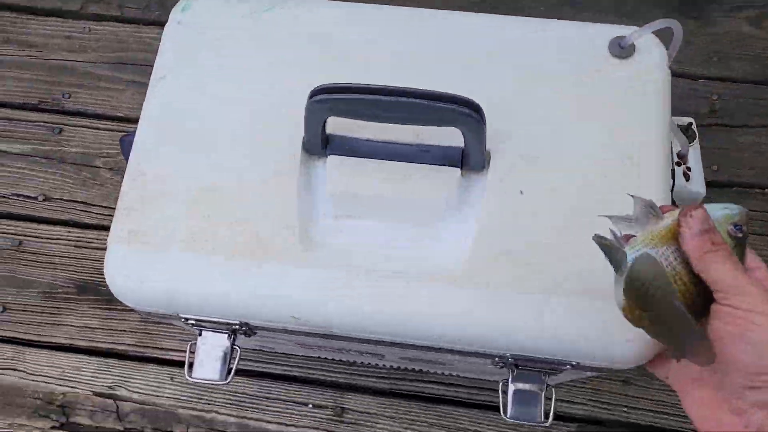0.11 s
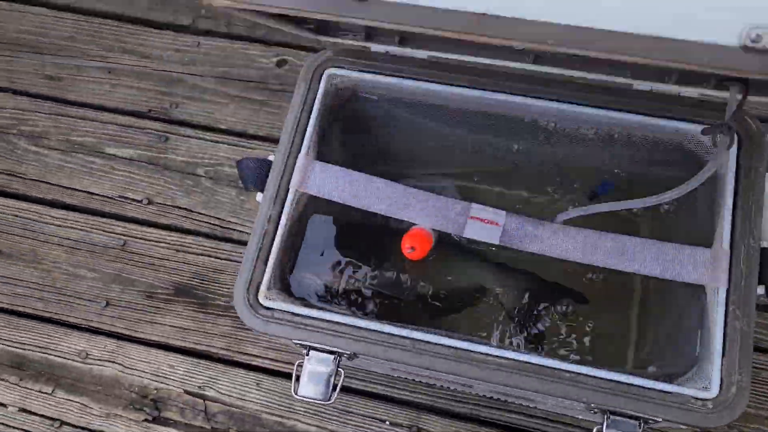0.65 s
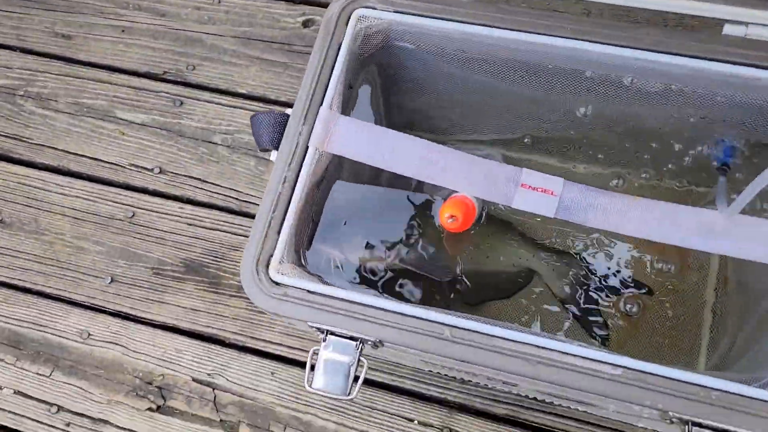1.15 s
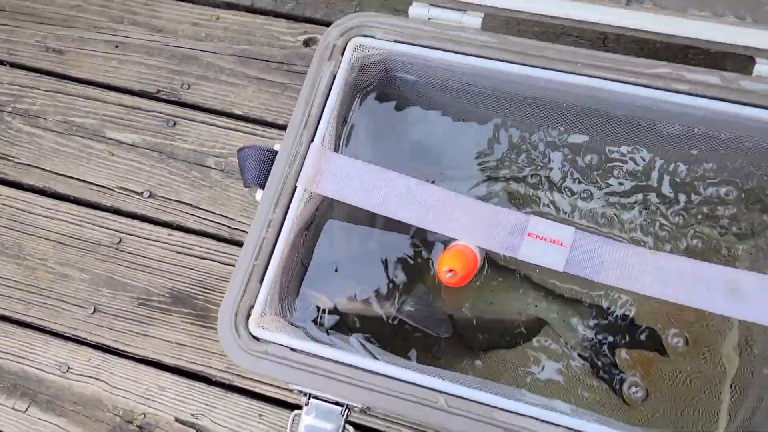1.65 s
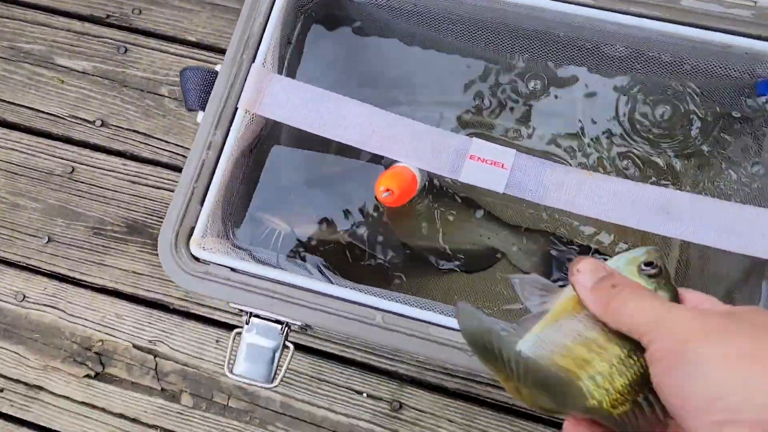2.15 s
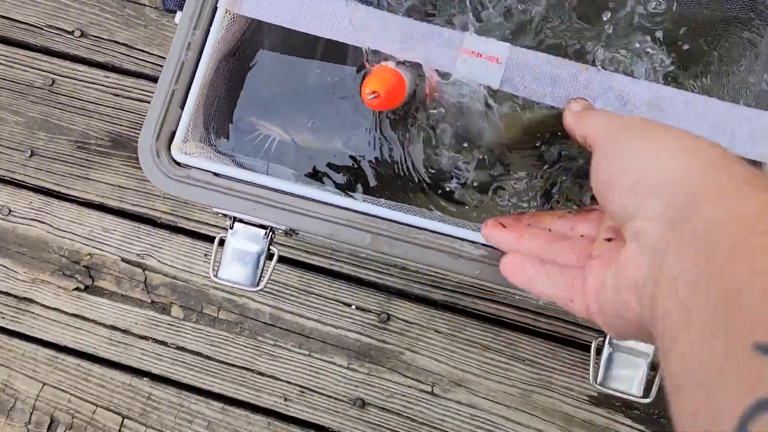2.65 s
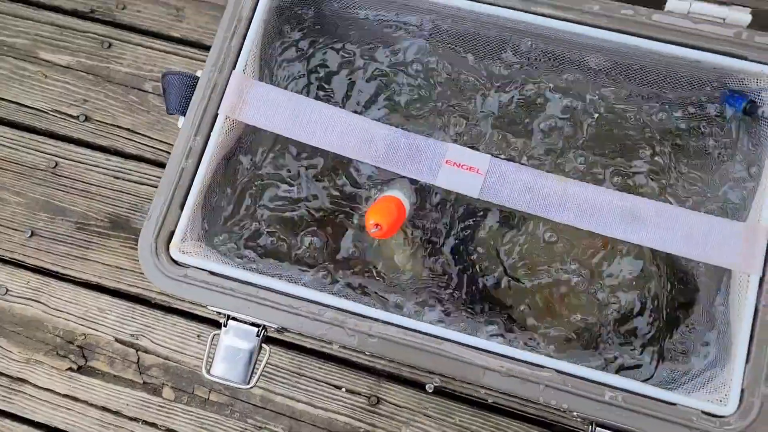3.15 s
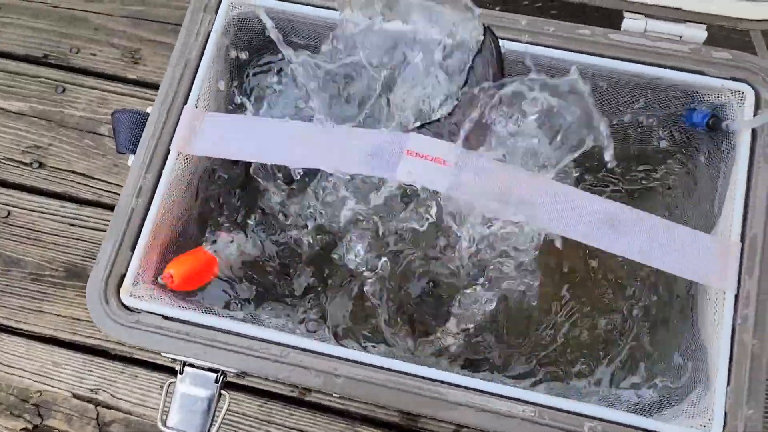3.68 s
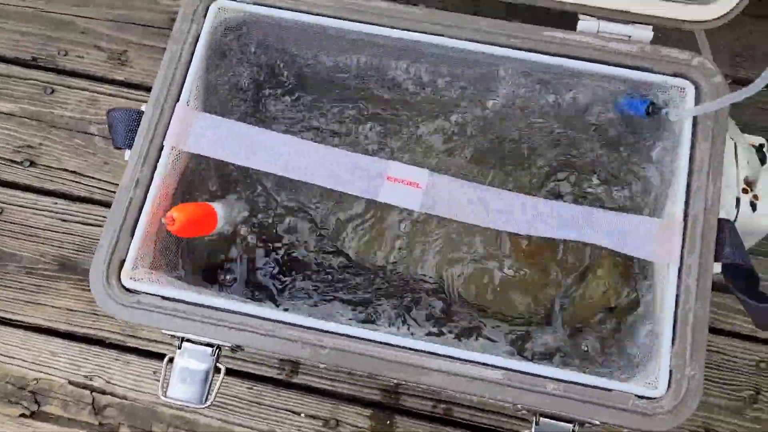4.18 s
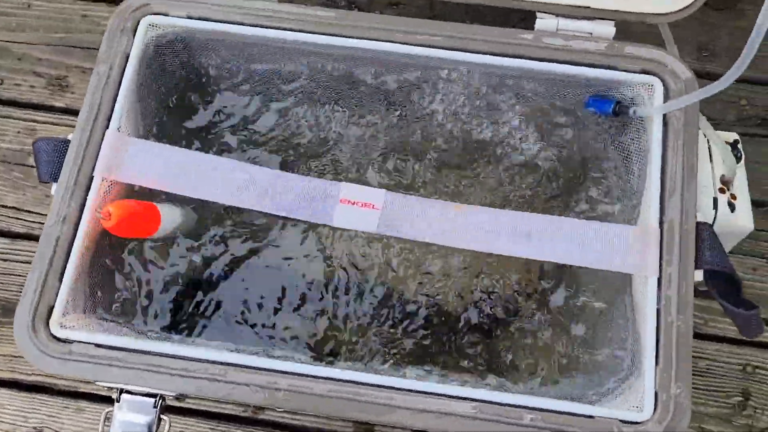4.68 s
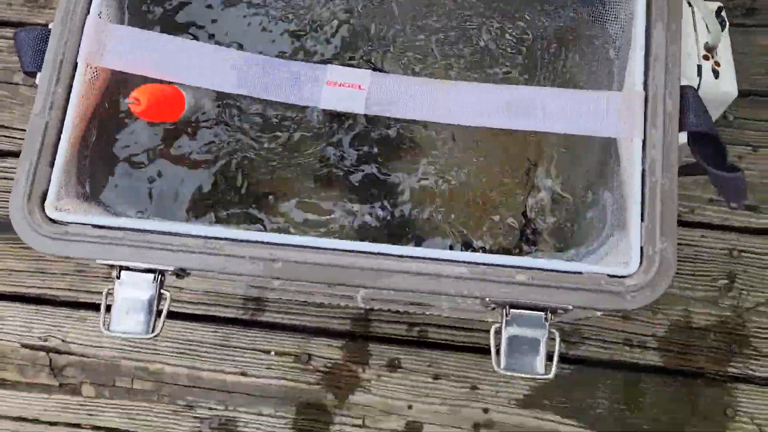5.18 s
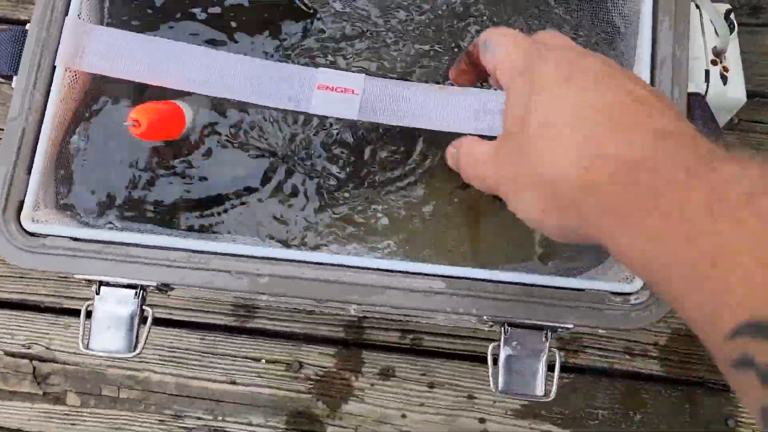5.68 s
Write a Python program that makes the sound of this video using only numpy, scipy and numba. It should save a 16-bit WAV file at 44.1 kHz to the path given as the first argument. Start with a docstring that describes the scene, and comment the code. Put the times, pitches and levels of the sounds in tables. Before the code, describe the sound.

On an open wooden dock by a lake, a small diaphragm pump runs throughout, close and to the right: a dry, rapid ticking of about eleven beats a second with gear rattle and a faint whine. Air fizzes finely in the water in matching pulses. Soft low bumps come through planks and hand from 0.3 s, and the pump dips slightly in level near 1 s as the lid is up. At 1.83 s a sharp crack knocks the plastic box. From 2.7 to 3.1 s a fish splashes in with crisp spray and plops. A lull follows, then the strongest thrashing, 3.7 to 4.15 s, with hollow gulps and bubbles, fading to small drips by 4.5 s. A distant boat engine drones low and drops in pitch around 3 s. Breeze rumbles gently on the phone. At 5.65 s a dull box thump and scuff, then faint wet rubbing squeaks.

```python
"""A wooden dock on a lake: close by on the right, a small diaphragm pump ticks round beside an open bait box.
Its valve knocks and gear rattle ring the housing; air fizzes up in the water as puffs of noise.
A fish flaps, is dropped in and thrashes ahead: noise bursts of spray, ringing air pockets, swarming bubbles.
Blows ring the box walls, dull bumps come through planks and hand, wet fingers squeak faintly.
A far boat engine drones and slows; a light breeze rumbles on the two ports of a hand-held phone."""
import sys
import numpy as np
from scipy import signal
from scipy.fft import rfft, irfft
from scipy.io import wavfile
from scipy.ndimage import uniform_filter1d, map_coordinates
from numba import njit

SR = 44100
rng = np.random.default_rng(int(sys.argv[2]) if len(sys.argv) > 2 else 0)


def to_wav(s):
    """Save 16-bit WAV."""
    ch = np.atleast_2d(s).T  # columns
    pcm = np.round(np.clip(ch, -1, 1) * 32767)  # PCM
    wavfile.write(sys.argv[1], SR, pcm.astype(np.int16))


def volts_from_db(level):
    """Convert decibel levels to linear amplitude ratios."""
    exponent = np.asarray(level, float) / 20
    return 10 ** exponent


N = 256662
T = np.arange(N) / SR


def shape(x, points):
    """Filters by points of f/Hz, gain/dB, joined along log frequency."""
    hz, db = np.transpose(points)
    f = np.maximum(np.arange(N // 2 + 1) * SR / N, 1)
    return irfft(rfft(x) * volts_from_db(np.interp(np.log(f), np.log(hz), db)), N)


def level(x, db):
    """Sets the rms over all channels together."""
    return x * volts_from_db(db) / np.sqrt(np.mean(x ** 2))


def curve(table):
    """Draws each column of a table along time, the first column being t/s."""
    s, *columns = np.transpose(table)
    return [np.interp(T, s, c) for c in columns]


def walk(rate):
    """Random wander: values held for 1 / rate s, then smoothed twice."""
    k = int(SR / rate)
    held = np.repeat(rng.standard_normal(N // k + 1), k)
    return 1.346 * uniform_filter1d(uniform_filter1d(held, k), k)[:N]


def swell(s, rise_s, fall_s):
    """Climbs exponentially to 1 at s, then dies away; both times are time constants."""
    return np.exp(np.minimum((T - s) / abs(rise_s), (s - T) / abs(fall_s)))


def noise(own):
    """Two channels of noise; a spread-out source gives each port a part of its own."""
    return rng.standard_normal(N) + own * rng.standard_normal((2, N))


def ring(x, hz, width):
    """One damped resonance whose impulse response peaks near 1."""
    return signal.lfilter([1], [1, -np.exp((2j * hz - width) * np.pi / SR)], x).imag


@njit
def add(out, s, size, hz, t60, rise, pan):
    """Adds tones that swell within about a cycle, then fade while their pitch climbs by the share rise."""
    for k in range(len(s)):
        i, z, n, swell = int(s[k] * SR), size[k] + 0j, t60[k] * SR, 0.
        p = np.exp(2j * np.pi * hz[k] / SR - np.log(1000) / n)
        turn = np.exp(2j * np.pi * hz[k] * rise[k] / SR / n)
        for j in range(i, min(i + int(n), out.shape[1])):
            swell += (1 - swell) * 2 * hz[k] / SR
            out[0, j] += z.imag * swell * pan[k]
            out[1, j] += z.imag * swell / pan[k]
            z, p = z * p, p * turn


def place(x, lag_ms):
    """A source right of centre reaches the left port later than the right."""
    x = x * np.ones((2, 1))
    late = map_coordinates(x[0], [np.arange(N) - lag_ms * SR / 1000], order=3)
    return np.array([late, x[1]])


CRANK_HZ = 10.66
LID_S, LID_DB = 1, -1  # the pump is quieter until the lid is up and the phone leans in
# modes of the pump housing, close on the right: f/Hz, width/Hz
HOUSING_MODES = [(490, 30), (720, 50), (1080, 75), (1545, 70), (1745, 85), (1960, 120), (3200, 500)]
# knocks of valves and rod in every crank turn: place in the turn (0-1), housing mode, drive level/dB
CRANK_KNOCKS = [(0.1, 0, -50), (0.8, 0, -56), (0.75, 1, -47), (0.94, 1, -46), (0.3, 1, -53),
                (0.94, 2, -41.5), (0.4, 2, -45.5), (.45, 4, -38.5), (0.99, 4, -38.5), (0.7, 4, -52),
                (.05, 3, -36.5)]
# gear rattle driving each housing mode, in their order: mean drive level/dB
RATTLE_DRIVE = [-82, -73, -73, -73, -68.5, -85.5, -68.5]
# gear-mesh tones: f/Hz, mean level/dB
GEAR_TONES = [(479.7, -67), (639.6, -69), (799.5, -71), (1066, -70)]


def pump():
    """Knocks and gear rattle ring the housing modes on every crank turn, over wavering gear tones."""
    starts = np.arange(int(N / SR * CRANK_HZ)) / CRANK_HZ
    taps = np.zeros((len(HOUSING_MODES), N + SR))
    for share, mode, db in CRANK_KNOCKS:
        chance = rng.standard_normal((len(starts), 2))
        when = starts + share / CRANK_HZ + .00005 * chance[:, 0]
        taps[mode, (when * SR).astype(int)] += volts_from_db(db + 1.5 * chance[:, 1])
    turn = T * CRANK_HZ % 1
    teeth = .4 + np.exp(-(turn * 15 % 1) / .3)  # 15 teeth a turn
    # worn teeth repeat their pattern; only a part is new on each turn
    pattern = 64 * irfft(np.exp(2j * np.pi * rng.random(2049)))
    rattle = teeth * (pattern[(turn * 4096).astype(int)] + .5 * noise(own=1.0))
    body = 0
    for tap, drive_db, (hz, width) in zip(taps, RATTLE_DRIVE, HOUSING_MODES):
        shake = volts_from_db(drive_db + 1.97 * walk(12)) * rattle
        # rubber valves land softly: a knock swells into its mode instead of clicking
        soft = ring(tap[:N] + shake, hz, 3 * width) * 6 * np.pi * width / SR
        body = body + ring(soft, hz, width)
    body = body * volts_from_db(LID_DB / (1 + np.exp((T - LID_S) / 0.1)))
    tones = sum(volts_from_db(db + 2 * walk(2.64)) * np.sqrt(2) * np.sin(2 * np.pi * hz * T) for hz, db in GEAR_TONES)
    return body + tones


# air from the stone in the water: t/s, level between puffs/dB, mean puff depth/dB
AIR_STONE = [(0, -55, -22), (1.9, -56, -7), (2.3, -58.5, 7), (3.6, -56, 4), (4.5, -51, -13),
             (4.9, -54.5, 4.5), (5.82, -53.5, -5.5)]
# its colour: f/Hz, relative level per Hz/dB
AIR_STONE_COLOUR = [(1500, 0), (2500, 2.5), (4500, 2), (7200, -4.5), (9000, -18), (14000, -7), (16500, -23)]


def fizz():
    """Tiny bubbles burst as grainy noise in puffs, two for each crank turn."""
    fizz_db, puff_db = curve(AIR_STONE)
    pulse = np.exp(1.03 * (np.cos(4 * np.pi * (T * CRANK_HZ - .02)) - 1))
    puff = 1 + volts_from_db(puff_db + 2 * walk(22)) * pulse
    grains = rng.standard_normal((2, N)) * volts_from_db(1.8 * walk(400))
    return level(shape(grains, AIR_STONE_COLOUR), 0.0) * puff * volts_from_db(fizz_db)


# hush of lake and shore all round: f/Hz, relative level per Hz/dB
SHORE_COLOUR = [(120, -15), (200, -1), (300, -5.5), (430, -2.5), (600, -8), (900, -8), (1400, -2.5),
                (2000, -4), (2600, -9.5), (5870, -18.5), (7320, -14.5), (11000, -30), (14500, -21),
                (15600, -19), (16500, -58)]


def open_air():
    """The wide hush of lake and shore is steady noise, mostly separate at each port."""
    return level(shape(noise(own=1.77), SHORE_COLOUR), -50)


THROTTLE_S, SLOWING_S = 3.0, 0.3  # throttled back from this moment, over this time
# far boat engine: cruising f/Hz, idling f/Hz, cruising level/dB, idling level/dB (before swells and waver)
ENGINE_DRONES = [(95, 56, -47, -54), (163.3, 110, -57, -56), (187.9, 173.5, -56.5, -58)]
# swells as the wind carries it over: t/s, level change/dB (each drone takes its own share)
WIND_CARRY = [(0, 5), (.4, -5.5), (.8, 0.5), (1.45, -4), (1.8, 4.5), (2.2, -6), (2.95, 6.5), (3.12, 3),
              (3.3, -6), (4, -1.5), (5.82, -1)]


def engine():
    """Three sine drones slide from cruise to idle and waver in pitch and level over the water."""
    idle = np.clip((T - THROTTLE_S) / SLOWING_S, 0, 1)
    carry_db = curve(WIND_CARRY)[0]
    out = 0
    for (hz0, hz1, db0, db1), share in zip(ENGINE_DRONES, (1.1, .4, -.3)):
        drone_db = db0 + (db1 - db0) * idle + share * carry_db + 1.93 * walk(13)
        hz = (hz0 + (hz1 - hz0) * idle) * (1 + 0.0218 * walk(18))
        out = out + np.sqrt(2) * volts_from_db(drone_db) * np.sin(2 * np.pi * np.cumsum(hz) / SR)
    return out


BREEZE_DB = -49.5  # steady part
SURGE_RISE, SURGE_FALL = 0.84, 0.29  # time constants as shares of the length of a gust or thump
# gusts at the microphone ports; the last row, short and strong, is the low thump of a hand bump:
# peak t/s, level/dB, length/s
GUSTS_AND_THUMP = [(0.356, -42, 0.34), (1.29, -47.5, 0.99), (1.994, -43.5, .5), (3.46, -47.5, .8),
                   (4.407, -47, 0.31), (4.69, -51, 0.19), (5.49, -42, 0.23), (5.68, -35, 0.059)]
# low rumble at the ports: f/Hz, relative level per Hz/dB
RUMBLE_COLOUR = [(12, -45), (20, 4.5), (91, 7.5), (140, 0.5), (184, -7.5), (236, -6.5), (353, -15),
                 (400, -17), (520, -60), (880, -120)]


def breeze():
    """Low rumble, partly shared by the ports; gusts and a hand's thump build slower than they drop."""
    rumble = rng.standard_normal(N) + 0.76 * rng.standard_normal((2, N))
    power = volts_from_db(BREEZE_DB) ** 2
    for s, db, length in GUSTS_AND_THUMP:
        power = power + (volts_from_db(db) * swell(s, SURGE_RISE * length, SURGE_FALL * length)) ** 2
    return level(shape(rumble, RUMBLE_COLOUR), 0) * np.sqrt(power)


BUMP_T60_S, BUMP_DAMPING = .125, 0.73  # at 60 Hz; higher bumps die sooner by this power
# dull bumps through planks and hand: t/s, starting level/dB, f/Hz
PLANK_BUMPS = [(0.328, -25, 59.5), (0.541, -25.5, 62), (0.593, -26, 127), (1.249, -26, 64.4),
               (2.955, -23, 149), (2.97, -23, 260), (3.03, -20.5, 322), (3.319, -24, 63), (3.558, -25, 264),
               (3.97, -24.5, 145), (4.066, -21, 380), (4.079, -31, 228), (4.111, -30.5, 110),
               (4.259, -24.5, 131), (4.74, -26, 70), (5.3, -30.5, 60), (5.335, -32.5, 223),
               (5.429, -24, 60)]


def bumps():
    """Each bump is a short low tone of steady pitch, alike at both ports."""
    out = np.zeros((2, N))
    s, db, hz = np.transpose(PLANK_BUMPS)
    add(out, s, volts_from_db(db), hz, BUMP_T60_S * (60 / hz) ** BUMP_DAMPING, 0 * s, 1 + 0 * s)
    return out


# blows on the bait box nearby: t/s, push level/dB, softness (contact time)/ms
BOX_BLOWS = [(1.83, -24, 0.63), (1.8332, -23, 0.78), (1.838, -32.5, 0.55), (1.856, -40, 0.41),
             (5.639, -34, 1.7), (5.645, -36, 2), (5.658, -21, 3.3), (5.676, -29.5, 3.8), (5.693, -47, 0.43),
             (5.706, -45, 1.1)]
# modes of its plastic walls: f/Hz, relative level/dB, t60/s
BOX_MODES = [(110, -26, .15), (179, -11, 0.14), (236, -11, 0.12), (337, -5, 0.047), (565.6, 4.5, 0.052),
             (682, 8, 0.046), (975, -12, 0.041), (1150, -20, .05), (2033, 7.5, 0.045)]


def box():
    """Soft pushes ring the plastic walls; longer contact favours the low modes."""
    push = np.zeros(N)
    for s, db, ms in BOX_BLOWS:
        bump = np.hanning(int(ms * SR / 1000) + 3)
        push[int(s * SR):][:len(bump)] += volts_from_db(db) * bump / bump.sum()
    return sum(-volts_from_db(db) * ring(push, hz, np.log(1000) / np.pi / t60) for hz, db, t60 in BOX_MODES)


# dry contact on the box, a crack and the scuff of a hand: t/s, level/dB, centre f/Hz, t60/s
CONTACT_NOISE = [(1.8336, -21.5, 6030, 0.014), (1.84, -29, 2100, .03), (5.64, -27.5, 420, 0.057),
                 (5.643, -35, 1800, 0.05), (5.661, -27.5, 348, 0.065), (5.685, -33, 760, 0.075)]


def scuffs():
    """Contact on the box makes bursts of noise about an octave wide, quick to start."""
    out = 0
    for s, db, hz, t60 in CONTACT_NOISE:
        band = ring(ring(noise(own=0.54), hz, 1.4 * hz), hz, 1.4 * hz)
        out = out + level(band, db) * swell(s + 0.0011, 0.00033, t60 / np.log(1000))
    return out


WATER_RISE_S = 0.037  # time constant
# spans in which bubbles form in the water ahead: from t/s, to t/s
STIRRED_SPANS = [(2.6, 3.3), (3.4, 4.7)]
# surges of stirred water: peak t/s, gurgle level/dB, hiss level/dB, fall time constant/s
WATER_SURGES = [(2.7, -49, -46, .012), (2.78, -48, -32.5, 0.071), (2.86, -61, -36.5, 0.045),
                (2.91, -41, -41.5, 0.051), (3.02, -50, -44, 0.1), (3.55, -48.5, -54, 0.091),
                (3.779, -32, -33, 0.062), (3.892, -34.5, -25.5, 0.046), (3.94, -37, -32.5, 0.025),
                (3.98, -29.5, -26, 0.027), (4.079, -32, -31, 0.066), (4.3, -57, -43.5, 0.13),
                (4.38, -46, -63, 0.046)]
# hiss of its droplets: f/Hz, relative level per Hz/dB
DROPLET_COLOUR = [(700, -6.5), (1300, 0.5), (2000, 0), (3500, 2.5), (5500, -3), (7200, -1), (9300, -14),
                  (14800, -8), (15800, -7), (16500, -42)]


def churn():
    """Every surge raises a swarm of gurgling bubble tones and a hiss of droplets."""
    swarm = np.zeros((2, N))
    for s0, s1 in STIRRED_SPANS:
        start, pitch, strength, life, side = rng.random((int((s1 - s0) * 2600), 5)).T
        hz = 520 * 7.23 ** pitch ** 1.16
        # small bubbles are weaker and die sooner
        size = volts_from_db(-2.8 * np.log(strength)) * (600 / hz) ** .2
        add(swarm, s0 + (s1 - s0) * start, size, hz, 15.0 / hz * (.5 + life), 0.19 * life, volts_from_db(1.9 * side))
    drops = shape(noise(own=0.93) * volts_from_db(2.4 * walk(500)), DROPLET_COLOUR)
    gurgle_power = hiss_power = 0
    for s, gurgle_db, hiss_db, fall_s in WATER_SURGES:
        surge = swell(s, WATER_RISE_S, fall_s)
        gurgle_power = gurgle_power + (volts_from_db(gurgle_db) * surge) ** 2
        hiss_power = hiss_power + (volts_from_db(hiss_db) * surge) ** 2
    gurgle = swarm / swarm[swarm != 0].std() * np.sqrt(gurgle_power) * volts_from_db(1.8 * walk(70))
    return gurgle + level(drops, 0) * np.sqrt(hiss_power) * volts_from_db(3.26 * walk(60))


SPRAY_RISE, SPRAY_SNAP = .14, 0.046  # rise as a share of t60; stronger bursts are shorter by this power
# slaps of spray ahead: t/s, then relative burst level/dB of body, fine mist, heavy drops
SPRAY_SLAPS = [(2.6889, -2.5, -21, -14), (2.696, -18, -42, -43), (2.7365, -10, -25, -20),
               (2.7463, -9, -19.5, -44), (2.7917, -15, -41, -17.5), (2.802, 7, -17, -17),
               (2.8177, -29, -40, -24), (2.837, -30, -45, -31), (2.8515, -1.5, -19, -25),
               (2.8574, -14, -37, -39), (2.886, -24, -42, -18.5), (2.906, -33, -49, -23),
               (3.004, -19, -34, -36), (3.0968, -8, -40, -40), (3.503, -28, -45, -31),
               (3.7264, -35, -56, -33), (3.7336, -7, -33, -16), (3.768, -26, -46, -34),
               (3.8817, -29, -34, -23), (3.9, -19, -40, -25), (3.94, -4, -18, -31), (3.959, -11, -46, -33),
               (4.0512, -30, -47, -20.5), (4.0874, -9, -26, -38), (4.1383, -11.5, -37, -36),
               (4.2544, -10.5, -30, -26), (4.3247, -10, -35, -28), (4.365, -19, -46, -29),
               (4.4292, -23, -28.5, -50), (4.488, -21, -30, -29)]
# body, mist, heavy drops: t60/s of a burst at -15 dB
SPRAY_FADE = [0.024, 0.022, 0.038]
# body, mist, heavy drops: left minus right level/dB
SPRAY_SIDE = [1, 3, 3]


def sprays():
    """Each slap throws short bursts of droplet noise; heavy drops last longest, and with the mist lean left."""
    ragged = volts_from_db(3.5 * walk(1500))
    heavy = shape(noise(own=0.88) * ragged, [(500, -6.5), (1200, -2.5), (2600, -3.0), (4000, -25.5)])
    body = shape(noise(own=1.0) * ragged, [(2000, -15), (3400, -2.5), (5500, 5.5), (7200, 4), (9500, -11.5)])
    mist = shape(noise(own=7.3), [(7000, -20), (9500, -0.5), (13000, 5.5), (15500, 7.5), (16500, -38)])
    layers = level(body, -3.5), level(mist, 7.3), level(heavy, 1.0)
    out = np.zeros((2, N))
    for s, *dbs in SPRAY_SLAPS:
        i = int(s * SR)
        for db, x, t60, pan_db in zip(dbs, layers, SPRAY_FADE, SPRAY_SIDE):
            t = T[:int(2 * t60 * SR)] * volts_from_db(SPRAY_SNAP * (db + 15))
            rise = (1 - np.exp(-t / (SPRAY_RISE * t60))) ** 2
            fade = volts_from_db(db - 60 * t / t60 + np.array([[pan_db], [-pan_db]]) / 2)
            out[:, i:i + len(t)] += rise * fade * x[:, i:i + len(t)]
    return out


PLOP_T60_S = .03  # at -22.5 dB and 1 kHz
VIOLENCE, POCKET = 0.12, 0.46  # harder plops die sooner, big low pockets last longer, by these powers
GULP_T60_S, GULP_RISE = 0.111, 0.347  # rise as a share of the starting pitch
# air pockets closing in the water ahead: t/s, starting level/dB, starting f/Hz
AIR_POCKETS = [(2.691, -26.5, 1640), (2.743, -28, 530), (2.792, -22, 1850), (2.802, -23.5, 1250),
               (2.836, -22, 1320), (2.885, -22.5, 747), (2.892, -19, 1900), (2.903, -25.5, 813),
               (2.962, -32, 780), (3.006, -25, 1700), (3.533, -28.5, 2270), (3.701, -33.5, 870),
               (3.735, -23, 520), (3.76, -15.5, 1450), (3.763, -13.5, 874), (3.769, -15.5, 1580),
               (3.809, -29, 1710), (3.866, -29.5, 656), (3.882, -22, 878), (3.9, -11, 1220),
               (3.946, -22, 1210), (3.96, -17.5, 1025), (3.974, -20, 853), (3.987, -28, 825),
               (4.033, -29, 1800), (4.051, -9, 1146), (4.063, -14.5, 1320), (4.079, -21, 498),
               (4.134, -31.5, 760), (4.171, -29.5, 1044), (4.253, -31.5, 1060), (4.398, -35.5, 1156),
               (4.487, -33, 1166)]
# long gulps of trapped air that climb in pitch: t/s, starting level/dB, starting f/Hz
AIR_GULPS = [(2.905, -32, 739), (3.775, -23.5, 621), (3.985, -29, 640), (4.1, -29.5, 658), (4.37, -37, 649)]


def plops():
    """An air pocket rings with rising pitch while it sheds five smaller bubbles; gulps ring longer."""
    s, db, hz = np.transpose(AIR_POCKETS)
    t60 = PLOP_T60_S * volts_from_db(-VIOLENCE * (db + 22.5)) * (1000 / hz) ** POCKET
    out = np.zeros((2, N))
    add(out, s, volts_from_db(db), hz, t60, 0.11 + 0 * s, 1 + 0 * s)
    gulp_s, gulp_db, gulp_hz = np.transpose(AIR_GULPS)
    same = 0 * gulp_s
    add(out, gulp_s, volts_from_db(gulp_db), gulp_hz, GULP_T60_S + same, GULP_RISE + same, 1 + same)
    for late, pitch, side in rng.random((5, 3, len(s))):
        small_hz = hz * (.85 + 1.1 * pitch ** 2)
        size, pan = volts_from_db(db - 2.0 - 12.7 * late), volts_from_db(8.8 * (side - .5))
        add(out, s + .35 * t60 * late, size, small_hz, .5 * t60, .3 * pitch, pan)
    return out


# wet fingers rub the strap, near the microphone: peak t/s, level/dB before roughness, fall time constant/s
STRAP_RUBS = [(5.718, -45, .012), (5.775, -42, .012), (5.808, -47, .012)]


def squeak():
    """Wet fingers squeak faintly on the strap: a thin tone, rough in level and pitch."""
    rubs = sum(volts_from_db(db) * swell(s, 0.0095, fall_s) for s, db, fall_s in STRAP_RUBS)
    hz = 1320 * (1 + 0.038 * walk(120))
    return rubs * volts_from_db(4.0 * walk(150)) * np.sin(2 * np.pi * np.cumsum(hz) / SR)


def scene():
    """Pump to the right, water ahead, engine far off; fizz and breeze have no lag between the ports."""
    water = place(churn() + sprays() + plops(), lag_ms=0.092)
    contact = place(bumps() + box() + scuffs() + squeak(), lag_ms=0.18)
    near = place(pump(), lag_ms=0.37) + contact
    far = place(engine(), lag_ms=0.4) + place(open_air(), lag_ms=0.409)
    return water + near + far + fizz() + breeze()


def band_limit(x):
    """A steep low-pass at the top of the band."""
    return signal.sosfilt(signal.butter(12, 16820, fs=SR, output="sos"), x)


# response of the hand-held phone's microphones: f/Hz, gain/dB
PHONE_RESPONSE = [(15, -23), (32, -4), (50, 1), (340, 0), (430, -5.5), (500, 0), (15600, 1.5), (16300, -25),
                  (17000, -60)]
# tilt between its two ports: f/Hz, left minus right level/dB
PORT_TILT = [(60, -3.5), (110, 0.5), (200, -1), (380, -3.5), (700, -1), (1290, 4.5), (2380, 0),
             (4400, -0.5), (8120, -6.5), (15000, -3.5)]


def record(dry):
    """The phone's response, tilted its own way at each port; the loudest peaks are rounded off."""
    ports = []
    for x, side in zip(dry, (1, -1)):
        tilt = [(hz, side * db / 2) for hz, db in PORT_TILT]
        ports.append(shape(shape(x, PHONE_RESPONSE), tilt))
    mix = np.tanh(np.array(ports))
    return band_limit(mix)


dry = scene()
out = record(dry)
to_wav(out)
```